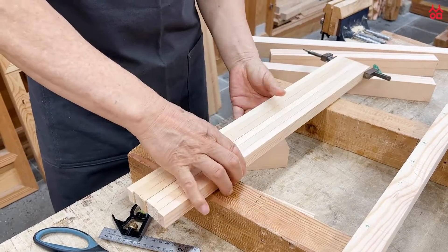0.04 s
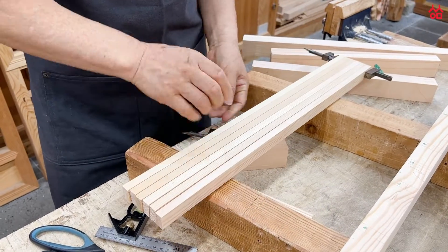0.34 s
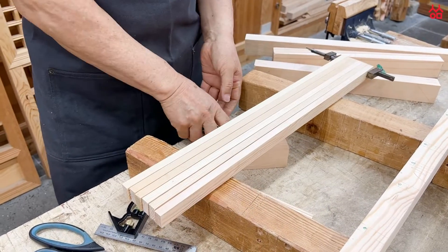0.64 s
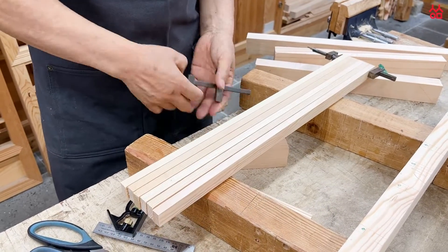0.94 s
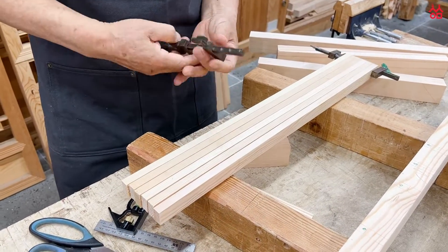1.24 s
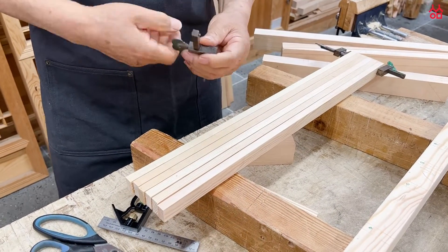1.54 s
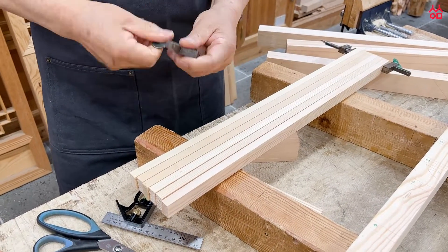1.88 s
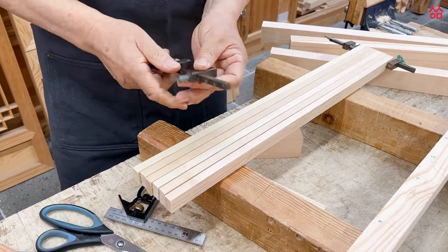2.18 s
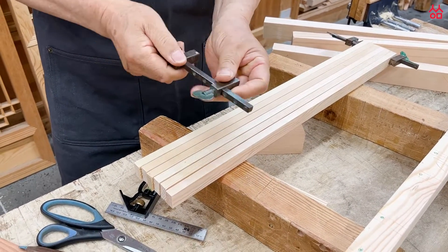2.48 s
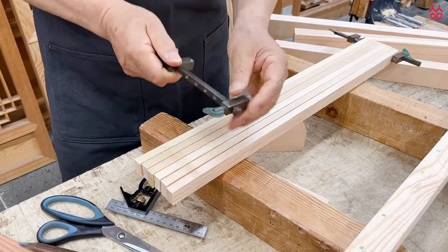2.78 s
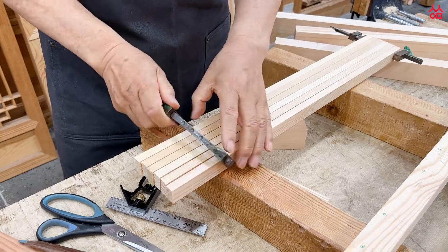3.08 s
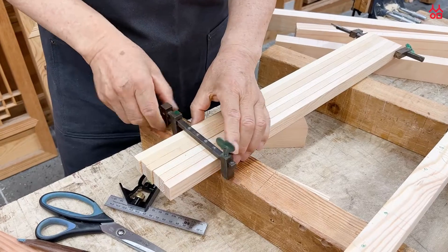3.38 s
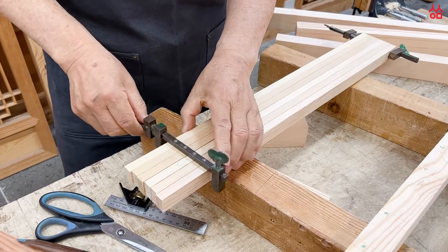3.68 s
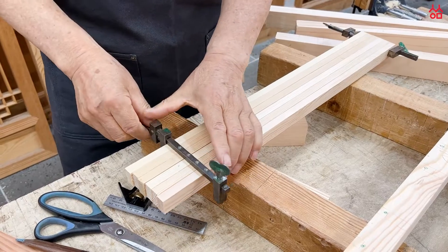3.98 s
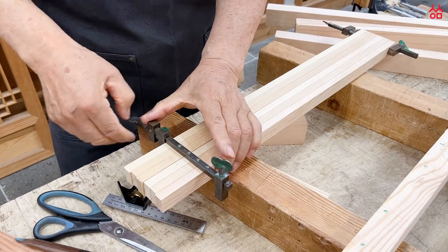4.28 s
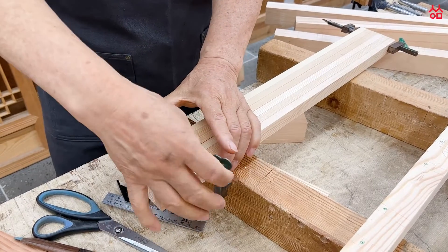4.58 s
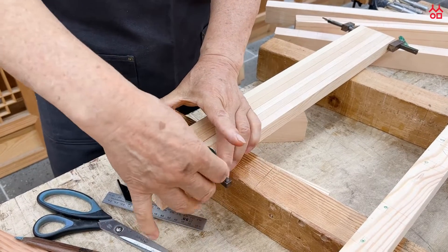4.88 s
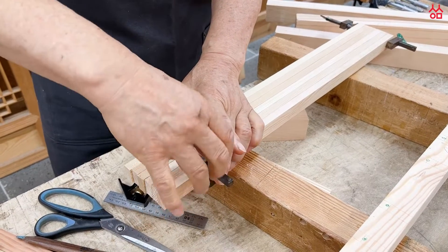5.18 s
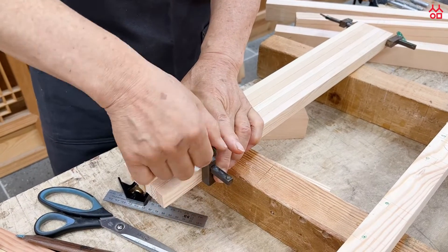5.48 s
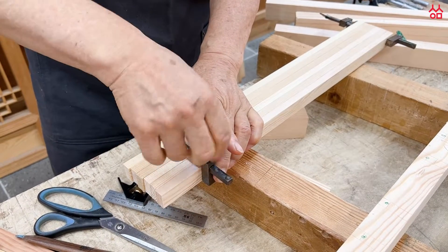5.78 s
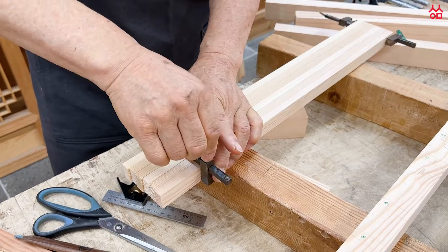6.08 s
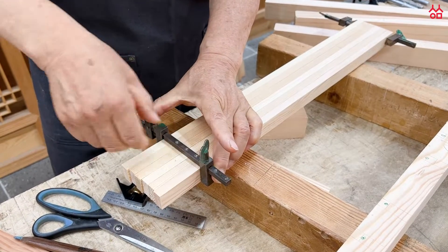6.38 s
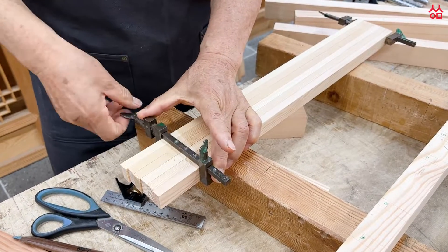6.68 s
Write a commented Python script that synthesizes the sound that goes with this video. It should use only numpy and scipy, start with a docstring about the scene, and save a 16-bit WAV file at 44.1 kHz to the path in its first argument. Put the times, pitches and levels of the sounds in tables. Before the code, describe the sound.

A faint, steady ventilation rush and low electrical hum fill a small workshop; the sounds are close, with a brief echo. In the first 0.8 seconds, thin wooden bars knock and clatter lightly, and the workbench thuds under them. From about 1 to 2.5 seconds, a small steel clamp clicks and rattles unevenly, with a faint brush of cloth. Its jaw slides briefly along the rail and hits the stop with a sharp, ringing click at 2.7 seconds. From 3.3 to 3.9 seconds, the clamp lands on the bars in a cluster of wooden knocks, metal clicks, short scrapes and a tiny squeak. After a light tap, a scrape at 4.7 seconds leads into the loudest knock, with a steel snap, at 4.8. Softer knocks follow until 5.4 seconds. Near 6.1 and 6.9 seconds come faint taps and soft hand rubbing.

```python
"""Wooden knocks and sharp steel clicks sound over the steady ventilation and mains hum of a small workshop.
Thin wooden bars are pushed into line: they clatter, and the workbench under them thuds. A small steel
bar clamp is picked up; its loose jaw rattles and slides along the rail to its stop. The clamp is set on
the bars, where it scrapes and squeaks, then it is knocked home and screwed tight. The room echoes briefly."""
import sys
import numpy as np
from scipy import signal
from scipy.fft import rfft, irfft, next_fast_len
from scipy.io import wavfile

SR = 44100
rng = np.random.default_rng(int(sys.argv[2]) if len(sys.argv) > 2 else 0)


def put_to_file(sound):
    """Save the sound as 16-bit audio at rate SR, in the file named by the first command-line argument."""
    columns = np.atleast_2d(sound).T  # one column per channel
    safe = np.clip(columns, -1, 1)
    whole_steps = np.round(safe * 32767)
    wavfile.write(sys.argv[1], SR, whole_steps.astype(np.int16))


N = 306049
AGE = np.arange(SR // 2) / SR  # seconds since a blow
LOOSE_FROM_S, LOOSE_TO_S = 3.25, 3.9  # the clamp lies loose on the bars, free to ring

# the dull noise of wood when knocked or rubbed (frequency [Hz], level [dB])
WOOD_NOISE = [(60, -30), (130, -8), (250, 3), (480, -0.5), (720, 4.5), (1300, -12), (4000, -55)]
# the crack of two hard surfaces meeting (frequency [Hz], level [dB])
CRACK_NOISE = [(120, -47), (400, -2.5), (1100, 5.5), (2000, 10.5), (2800, 7.5), (3600, -7), (5500, -3),
               (15000, -26)]


def wood_knocks():
    """Pushed bars give a short knock, then clatter; the heavy bench follows late. Rows: push, clatter."""
    # blows on the wood (time [s], level [dB], pitch [Hz], bench share [dB], crack share [dB])
    blows = [(0.1409, -25, 760, -9, -22), (0.5637, -41, 650, 2, -10.5), (0.7097, -33, 1080, 3.5, -18),
             (0.777, -22, 530, -3, -41), (3.26, -28, 1030, -7.5, -17.5), (3.283, -19, 1070, -8, -21),
             (3.2859, -22.5, 372, 2.5, -23), (3.427, -23.5, 1050, -17, -30), (3.449, -30.5, 1310, -16, -6),
             (3.5964, -17.5, 1133, -4.5, -21.5), (3.7905, -28.5, 880, -10, -17.5),
             (3.848, -16, 950, -12.5, -15.5), (4.173, -32, 1200, -10, -16), (4.7107, -25.5, 950, -12, -9.5),
             (4.725, -25.5, 910, -11, -30), (4.8076, -8, 927, -14, -15.5), (5.043, -35, 626, -0.5, -10),
             (5.2482, -30, 895, -4, -5.5), (5.412, -40, 900, -1, -6), (6.1123, -36, 703, -6.5, -10.5),
             (6.8815, -48.5, 776, -12, 2)]
    # tones of the bars, the bench top and the frame under it (frequency [Hz], level [dB], ring time [s])
    bar_tones = [(656.6, -10, 0.04), (915, -15, 0.029), (1100, -8, 0.035), (1243, -0.5, 0.02),
                 (1850, -12, 0.02)]
    top_tones = [(254.2, -3, 0.15), (293, -8, 0.05), (329, -6.5, 0.12), (430, -12, 0.13)]
    frame_tones = [(118, 0, 0.11), (140, -5, 0.08), (186, 4, 0.09)]
    out = np.zeros((2, N))
    for start, db, hz, bench_db, crack_db in blows:
        swell = AGE * hz / 1.07  # softer contacts are lower and longer
        push = swell ** 2 * np.exp(2 * (1 - swell)) * np.sin(2 * np.pi * hz * AGE)
        bars = amp(7.0) * ring(bar_tones) * rise(0.11)
        top = (ring(top_tones) + amp(-13) * burst(WOOD_NOISE, ring_s=0.12)) * rise(0.0024)
        # the clamp dropping on the bars shakes the frame more than a push along them
        frame_db = -4.5 if LOOSE_FROM_S < start < LOOSE_TO_S else -18
        frame = amp(frame_db) * ring(frame_tones) * rise(0.0082)
        crack = burst(CRACK_NOISE, ring_s=0.026) * rise(0.0018)
        clatter = bars + amp(bench_db) * (top + frame) + amp(crack_db) * crack
        add(out, start, amp(db) * np.array([push, clatter]))
    return out


def clamp_clicks():
    """Steel hits steel, bounces once and rings on as far as its support allows. Rows: ping, snap."""
    # hits of the jaw (time [s], level [dB], jaw pitch [Hz], rail share [dB])
    hits = [(0.269, -41.5, 4800, -3.5), (0.4999, -42, 5450, 3), (0.6955, -33, 5010, -3.5),
            (0.7103, -31.5, 4700, -15), (0.986, -44, 6250, -7), (1.266, -36.5, 6330, -12),
            (1.3305, -31, 6200, -18), (1.407, -29.5, 5400, -14), (1.4113, -29.5, 5550, -18),
            (1.44, -31, 6500, -13), (1.4449, -24.5, 5680, -15), (1.4815, -23, 5900, -20),
            (1.9895, -43, 6000, 5), (2.067, -36.5, 6130, -9), (2.146, -33.5, 5400, -5),
            (2.1735, -30, 5220, -15), (2.255, -28.5, 6600, -21), (2.276, -28, 7750, -26),
            (2.285, -25, 6270, -12), (2.363, -33.5, 6750, -5.5), (2.5082, -31, 5370, -7),
            (2.6817, -12.5, 7120, -5.5), (2.6847, -29, 5540, -3), (2.873, -40.5, 5940, -2),
            (2.884, -37, 5930, -2), (3.286, -30, 5560, -23), (3.299, -35, 5700, -8),
            (3.388, -34, 5470, -10), (3.401, -31.5, 7500, -14), (3.46, -34, 7500, 5),
            (3.528, -40.5, 5800, 0), (3.5847, -36.5, 5100, -12), (4.133, -40, 5600, -6),
            (4.221, -51.5, 5200, 14.5), (4.752, -32.5, 6100, -3), (4.7742, -45, 7300, -2),
            (4.8079, -26, 5550, 11), (5.1875, -47, 4660, 2.5)]
    # the clamp picked up, held by its rail, lying loose, seated (bright edge [dB], ringing [dB])
    supports = [(-18.5, -27), (-11.5, -24), (-6, -17), (-19, -13)]
    # tones of the free clamp and of the seated screw and jaw (frequency [Hz], level [dB], ring time [s])
    free_tones = [(5300, -4, 0.13), (6350, -3, .13), (7200, -3, .15), (7900, 2, 0.17), (9680, 0, 0.3)]
    seated_tones = [(2900, 0.18, .025), (4670, -2.2, .03), (5700, -2.2, 0.015)]
    turned_s = 1.7  # the clamp is turned over and held by its rail
    firm_hit_db, bounce_db = -20, -6.5
    out = np.zeros((2, N))
    for start, db, hz, rail_db in hits:
        edge_db, ring_db = supports[np.searchsorted([turned_s, LOOSE_FROM_S, LOOSE_TO_S], start)]
        edge_db = edge_db + 0.36 * (db - firm_hit_db)  # harder hits are brighter
        bounce_s = 0.0028 * rng.uniform(.85, 1.15)
        bounce_hz = hz * rng.uniform(.93, 1.07)
        add(out, start, amp(db) * steel_touch(hz, rail_db, edge_db))
        add(out, start + bounce_s, amp(db + bounce_db) * steel_touch(bounce_hz, rail_db, edge_db))
        tones = seated_tones if start > LOOSE_TO_S else free_tones
        add(out[0], start, amp(db + ring_db) * ring(tones))
    return out


def steel_touch(hz, rail_db, edge_db):
    """One touch makes jaw and rail ping, with a noisy, bright-edged snap. Rows: ping, snap."""
    # tones of the jaw (frequency [times the jaw's pitch], level [dB], ring time [s])
    jaw_tones = [(.55, -7, 0.026), (1, 13.5, 0.0057), (1.35, 1, 0.0088)]
    # tones of the rail (frequency [Hz], level [dB], ring time [s])
    rail_tones = [(1400, -6, 0.0071), (1800, -4.5, 0.009), (2204, -3.5, 0.013)]
    # the bright edge of the snap (frequency [Hz], level [dB])
    edge_noise = [(1500, -18.5), (4000, -1.5), (6500, 5), (9500, -6), (12500, -6.5), (16000, -20)]
    ping = ring(np.multiply(jaw_tones, [hz, 1, 1])) + amp(rail_db) * ring(rail_tones)
    crack = amp(rail_db - 5.5) * burst(CRACK_NOISE, ring_s=0.013)
    edge = amp(edge_db) * burst(edge_noise, ring_s=0.019)
    return np.array([ping, crack + edge]) * rise(0.00085)


def jaw_rattle():
    """The loose jaw ticks faintly at uneven moments while the clamp is turned in the hands."""
    # fingers turning the clamp over (start [s], length [s], level [dB])
    turns = [(0.849, .27, -50), (1.812, .12, -44.5), (2.201, .07, -40)]
    ticks_per_s, tick_hz, spread_db = 30, 5720, 7.5
    out = np.zeros(N)
    for start, length, db in turns:
        for k in range(round(length * ticks_per_s)):
            hz = tick_hz * np.exp(0.096 * rng.standard_normal())
            size = amp(db + spread_db * rng.standard_normal())
            when = start + (k + rng.random()) / ticks_per_s
            add(out, when, size * steel_touch(hz, rail_db=-16, edge_db=-20).sum(axis=0))
    return out


def jaw_squeak():
    """The pushed jaw sticks and slips unevenly; its pitch is highest mid-push and sags as it lets go."""
    # pushes of the jaw up to the bars (start [s], length [s], level [dB])
    pushes = [(3.75, 0.029, -44), (3.842, 0.014, -33.5)]
    slip_hz, sag_hz_per_s = 1040, 4500
    out = np.zeros(N)
    for start, length, db in pushes:
        hz = slip_hz - sag_hz_per_s * np.abs(np.arange(N) / SR - start - length / 2)
        waver = wobble(below_hz=250)
        cycles = np.cumsum(hz * (1 + .05 * waver)) / SR
        tone = unit(amp(2 * waver) * np.sin(2 * np.pi * cycles))
        out += strokes([(start, length, db)], rise_s=0.011, fall_s=0.0098) * tone
    return out


def jaw_slide():
    """The jaw rubs along the rail, louder as it gathers speed."""
    # slides of the jaw (start [s], length [s], level at the end [dB])
    slides = [(2.485, 0.03, -48), (2.628, 0.061, -38)]
    # steel rubbing on steel (frequency [Hz], level [dB])
    slide_noise = [(710, -42), (1200, -13), (1670, -9.5), (2350, 0.5), (3270, -32), (5300, -10),
                   (6400, -18), (8210, -20.5), (15000, -47)]
    loudness = strokes(slides, rise_s=0.0068, fall_s=0.0028, grow_db_per_s=220)
    return loudness * friction(slide_noise, slips_per_s=710, smooth=0.64, catch_db=4)


def clamp_scrape():
    """The clamp catches and lets go as it drags over the wood."""
    # drags of the clamp (start [s], length [s], level [dB])
    drags = [(.695, 0.018, -41), (3.435, 0.041, -41), (3.51, 0.13, -52), (3.73, 0.079, -47.5),
             (4.704, 0.099, -38.5)]
    # steel rubbing on wood (frequency [Hz], level [dB])
    drag_noise = [(88, -17), (230, -9.5), (850, -2), (1600, -13), (2900, -23), (3700, -23), (15000, -51)]
    loudness = strokes(drags, rise_s=0.0025, fall_s=0.013)
    return loudness * friction(drag_noise, slips_per_s=1200, smooth=0.94, catch_db=6)


def hand_rub():
    """Hands rub softly as they shift on the bars."""
    # moves of the hands (start [s], length [s], level [dB])
    moves = [(.1, 0.18, -61.5), (.6, 0.094, -54), (.75, 0.15, -52), (4.17, 0.25, -61.5),
             (6.2, 0.016, -46.5), (6.79, 0.12, -55)]
    loudness = strokes(moves, rise_s=0.0059, fall_s=0.069)
    return loudness * friction(WOOD_NOISE, slips_per_s=240, smooth=0.98, catch_db=-2.0)


def apron_rustle():
    """Skin and apron brush past with a faint hiss."""
    # brushing moves (start [s], length [s], level [dB])
    moves = [(.6, 0.34, -63.5), (.95, 0.62, -69), (1.83, 0.083, -65), (2.22, 0.069, -58.5),
             (6.2, .2, -69.5), (6.8, 0.11, -67)]
    # skin and cloth rubbing (frequency [Hz], level [dB])
    brush_noise = [(500, -59), (2000, 20.5), (5000, 4), (8000, -1.5), (15000, -23)]
    loudness = strokes(moves, rise_s=0.022, fall_s=0.046)
    return loudness * friction(brush_noise, slips_per_s=570, smooth=0.88, catch_db=7.5)


def bar_shudder():
    """The bars shudder on the bench frame as weight shifts on them."""
    # shifts of weight (start [s], length [s], level [dB])
    shifts = [(.12, 0.14, -55), (3.488, 0.012, -41)]
    # the low rumble of the shudder (frequency [Hz], level [dB])
    rumble = [(75, -27), (125, 22), (170, 16), (400, -36)]
    return strokes(shifts, rise_s=0.0077, fall_s=0.015) * coloured(rng.standard_normal(N), rumble)


def room_echo(sound, build_s):
    """The echo swells as reflections gather, and each frequency dies away at its own speed."""
    # how long the workshop rings (frequency [Hz], ring time [s])
    ring_times = [(100, 0.78), (500, 0.43), (2800, 0.47), (7000, 0.35), (15000, 0.31)]
    hz, t, bands = signal.stft(rng.standard_normal(len(AGE)), SR, nperseg=256)
    decay = np.exp(-np.log(1000) * t / value_at(ring_times, hz)[:, None])
    tail = signal.istft(bands * decay, SR)[1][:len(AGE)] * rise(build_s)
    return signal.fftconvolve(sound, tail / np.linalg.norm(tail))[:N]


def ventilation_and_hum():
    """The ventilation gives a steady rush of air, and the mains adds two low tones."""
    # the rush of air and the tones of the hum (frequency [Hz], level [dB])
    air_noise = [(53, -38), (90, -3.5), (124, -5.5), (147, -9), (241, -5.5), (274, -9), (347, -6.5),
                 (532, -6), (1030, -5.5), (4150, -28), (13500, -46), (15000, -68)]
    hum_tones = [(58.7, -61), (240, -71.5)]
    air = amp(-54.5) * coloured(rng.standard_normal(N), air_noise)
    hum = sum(amp(db) * np.sqrt(2) * np.sin(2 * np.pi * hz * np.arange(N) / SR) for hz, db in hum_tones)
    return air + hum


def ring(tones):
    """Fading tones; each blow finds another spot and grip, which shift their pitch and level a little."""
    hz, db, ring_s = np.transpose(tones)
    hz = hz * (1 + .012 * rng.standard_normal(len(hz)))
    size = amp(db + 1.2 * rng.standard_normal(len(hz)))
    sign = (-1) ** np.arange(len(hz))  # neighbouring tones swing opposite ways
    waves = fade(ring_s[:, None]) * np.sin(2 * np.pi * hz[:, None] * AGE)
    return (sign * size) @ waves / amp(db).sum()


def burst(spectrum, ring_s):
    """The brief noise of two surfaces meeting."""
    return coloured(rng.standard_normal(len(AGE)), spectrum) * fade(ring_s)


def friction(spectrum, slips_per_s, smooth, catch_db):
    """Tiny slips over smooth rubbing; the surfaces catch and let go in spurts."""
    slips = (rng.random(N) < slips_per_s / SR) * rng.standard_normal(N)
    spurts = amp(catch_db * np.tanh(wobble(below_hz=110)))
    rubbing = unit(slips) + smooth * rng.standard_normal(N)
    return coloured(rubbing * spurts, spectrum)


def strokes(rows, rise_s, fall_s, grow_db_per_s=0):
    """Loudness over time: each stroke sets in, holds or grows until its end, then dies away."""
    t, gain = np.arange(N) / SR, np.zeros(N)
    for start, length, db in rows:
        onset = np.clip((t - start) / rise_s + .5, 0, 1)
        left_s = start + length - t
        level = amp(db - grow_db_per_s * np.clip(left_s, 0, length))
        gain += onset * level * np.exp(np.minimum(left_s, 0) / fall_s)
    return gain


def fade(ring_s):
    """Dying away after a blow: 60 dB quieter once the ring time has passed."""
    return np.exp(-np.log(1000) * AGE / ring_s)


def rise(seconds):
    """Growing from silence to almost full strength in the given time."""
    return 1 - fade(seconds)


def wobble(below_hz):
    """A random wavering made of low frequencies only."""
    return unit(filtered(rng.standard_normal(N), lambda hz: hz < below_hz))


def coloured(sound, spectrum):
    """Shape a sound's lows and highs by a table, then scale it to strength 1."""
    return unit(filtered(sound, lambda hz: amp(value_at(spectrum, hz))))


def filtered(sound, gain):
    """Turn each frequency up or down by gain(hz)."""
    size = next_fast_len(len(sound) + SR // 4)
    hz = np.fft.rfftfreq(size, 1 / SR)
    return irfft(rfft(sound, size) * gain(hz), size)[:len(sound)]


def value_at(points, hz):
    """Read between the rows of a (frequency, value) table, on a log frequency scale."""
    frequencies, values = np.transpose(points)
    return np.interp(np.log(hz + 1), np.log(frequencies + 1), values)


def add(track, start, sound):
    """Mix a sound into a track, beginning at start seconds."""
    part = track[..., max(round(start * SR), 0):][..., :sound.shape[-1]]
    part += sound[..., :part.shape[-1]]


def amp(db):
    """Turn decibels into a multiplier."""
    return 10 ** (np.asarray(db) / 20)


def unit(sound):
    """Scale to an average strength (rms) of 1."""
    return sound / np.sqrt(np.mean(sound ** 2) + 1e-20)


def scene():
    """Wood and steel close by, with the room behind them."""
    background = ventilation_and_hum()
    push, clatter = wood_knocks()
    ping, snap = clamp_clicks()
    steel = ping + jaw_squeak() + jaw_slide()
    clatter = clatter + clamp_scrape() + hand_rub() + apron_rustle() + bar_shudder()
    # push, ping, squeak and slide carry less into the room than clatter and snap
    wood_echo = amp(-6.5) * room_echo(amp(-5.5) * push + clatter, build_s=0.0024)
    steel_echo = amp(-8.5) * room_echo(amp(-7) * steel + snap, build_s=0.0134)
    return (push + clatter + steel + snap + jaw_rattle() + wood_echo + steel_echo + background)[None]


def record(dry):
    """Cut away the deepest bass and the very highest treble."""
    bass_cut = signal.butter(4, 42, "highpass", fs=SR, output="sos")
    return filtered(signal.sosfilt(bass_cut, dry[0]), lambda hz: hz < 16200)[None]


dry = scene()
out = record(dry)
put_to_file(out)
```